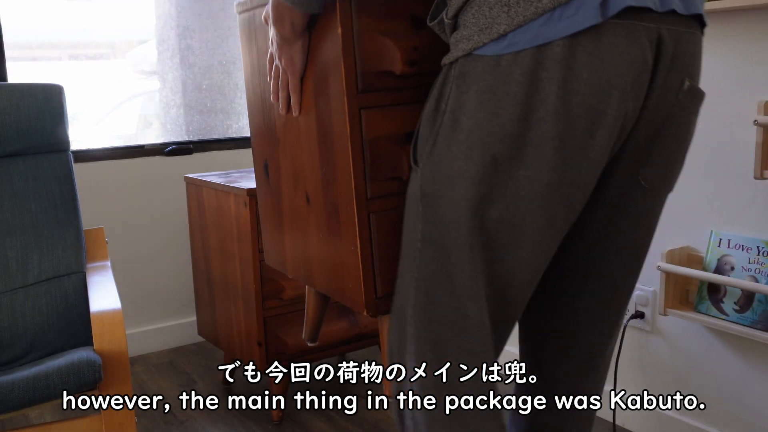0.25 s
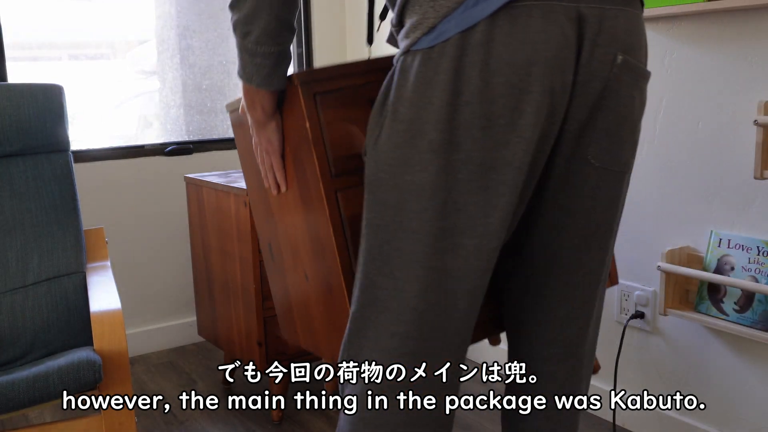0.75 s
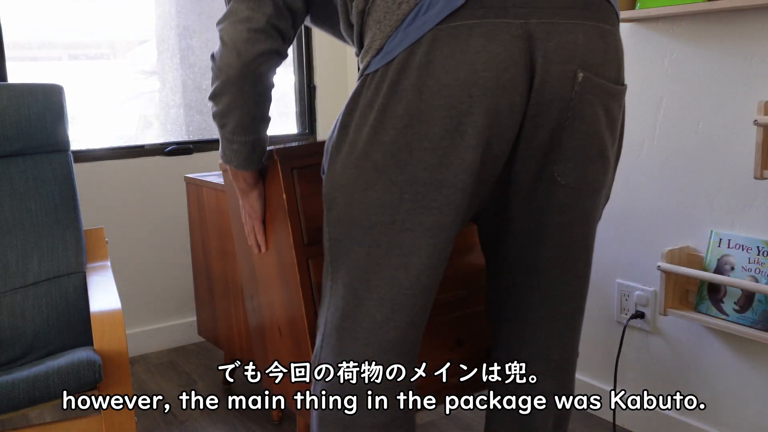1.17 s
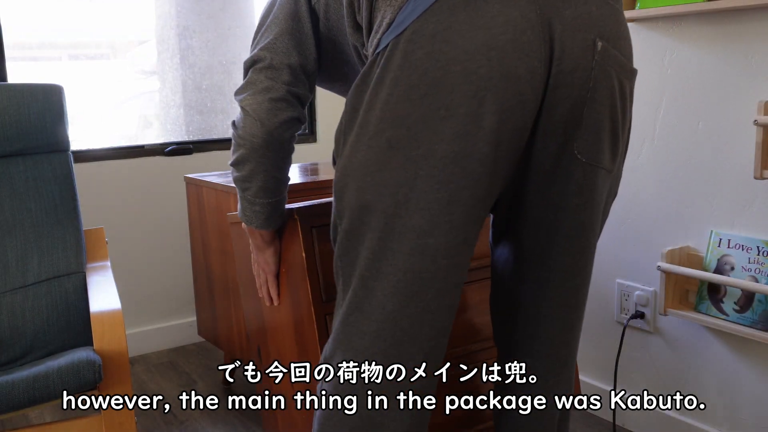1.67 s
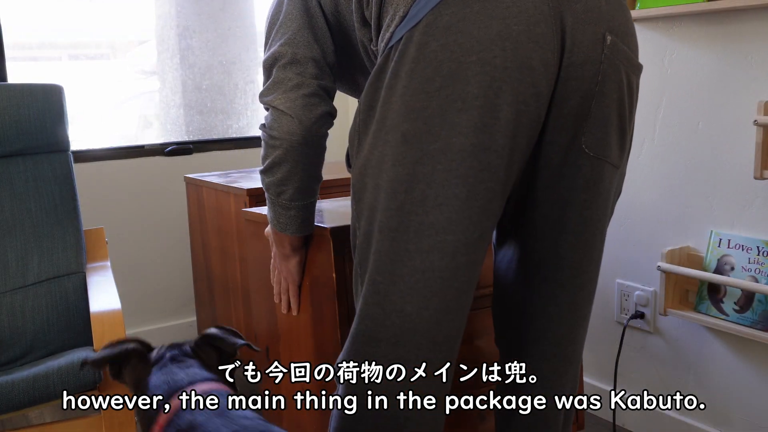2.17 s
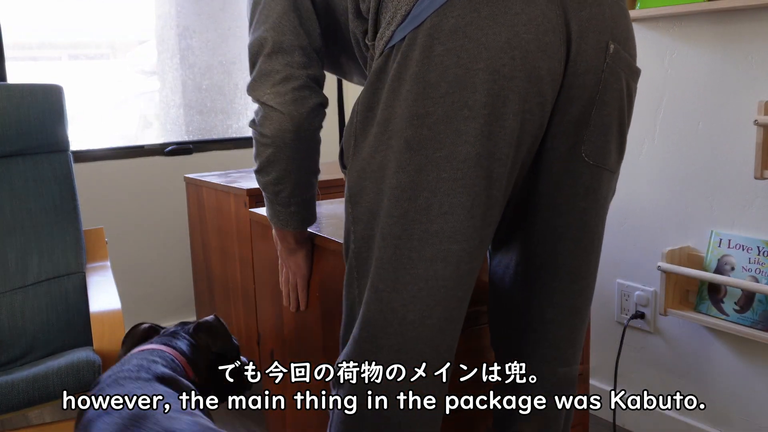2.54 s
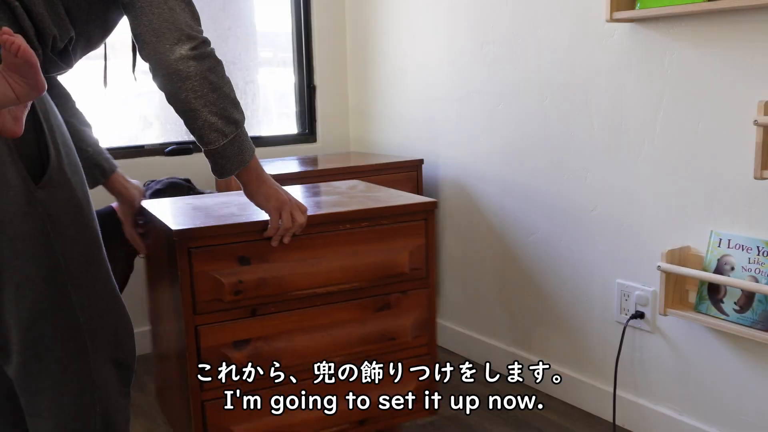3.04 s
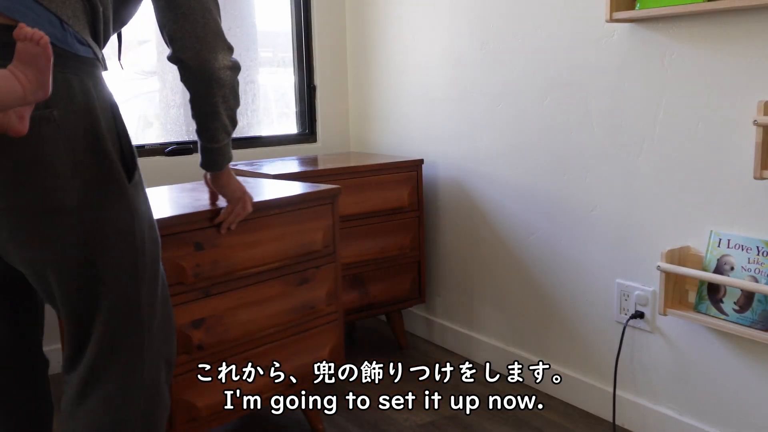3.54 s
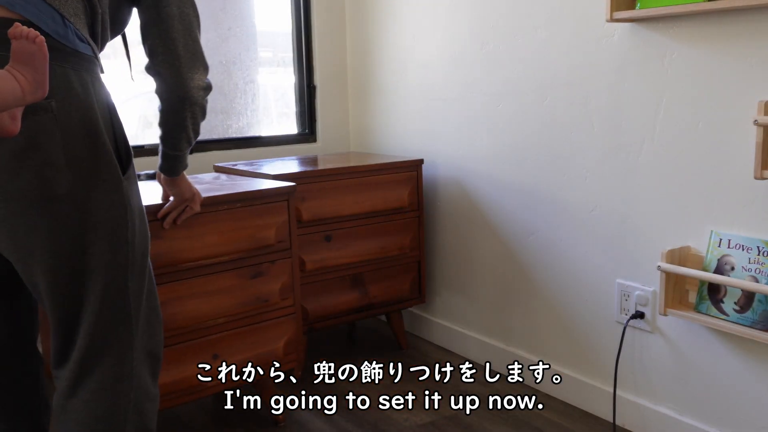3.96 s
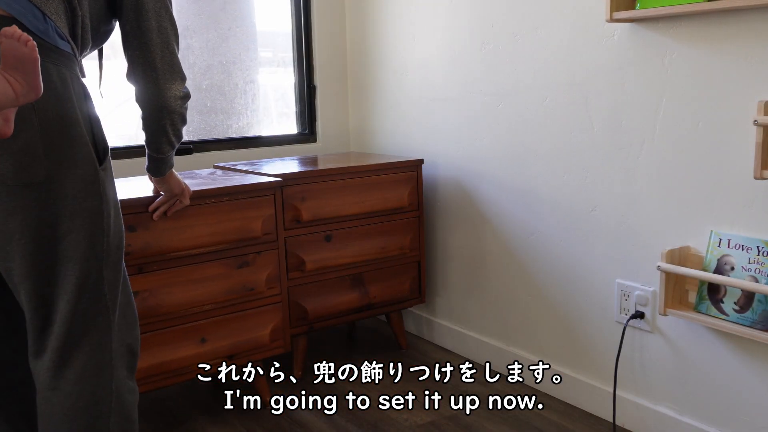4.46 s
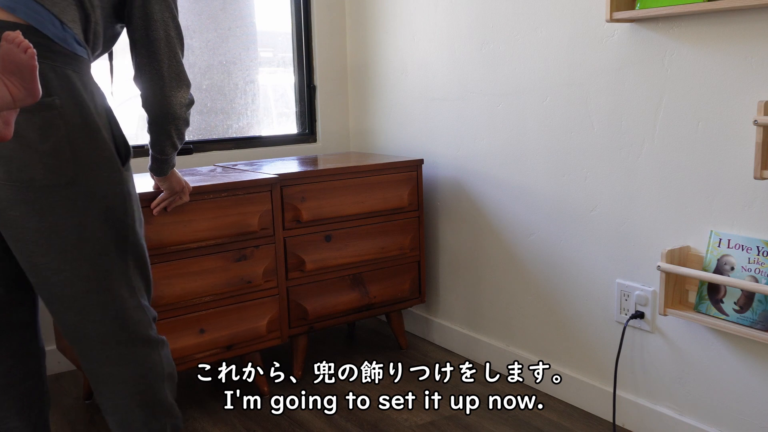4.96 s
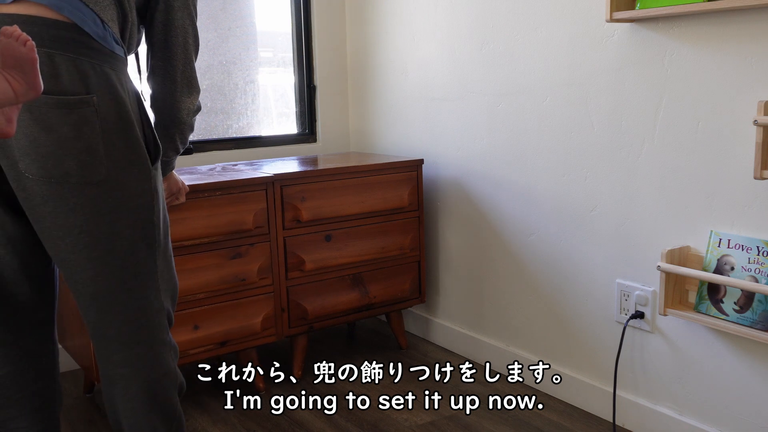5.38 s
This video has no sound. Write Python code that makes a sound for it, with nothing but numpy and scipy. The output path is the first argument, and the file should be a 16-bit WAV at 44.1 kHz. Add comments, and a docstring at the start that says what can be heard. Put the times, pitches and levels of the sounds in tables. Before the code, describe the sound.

A wooden chest of drawers is tilted and set down with rattling knocks, then abruptly it is pushed hissing and scraping across a hard floor.

```python
"""A small wooden chest of drawers is tilted and set down on a hard bedroom floor: flurries of tiny
impacts, ringing in the modes of the wood, make the loose drawers rattle against the case.
Hands and clothes rub on it as coloured noise in strokes; legs tick and scuff as short runs of slips.
After a sudden cut the chest is pushed along: dense slips make a long hiss, one foot sings faintly as
a wavering sine, and the chest bumps as it slows. Each spot of contact has its own bedroom echoes."""
import sys
import numpy as np
from scipy import signal
from scipy.fft import rfft, irfft
from scipy.io import wavfile

SR = 44100
rng = np.random.default_rng(int(sys.argv[2]) if len(sys.argv) > 2 else 0)


def pcm_store(signal):
    """Save signal as 16-bit PCM."""
    levels = np.round(np.clip(np.atleast_2d(signal), -1, 1) * 32767)
    wavfile.write(sys.argv[1], SR, levels.astype(np.int16).T)


N = 247644
TIME = np.arange(N) / SR
CUT_S = 2.997  # setting down before it, pushing after it


def undb(db):
    """Decibels to gain."""
    return 10 ** (np.asarray(db) / 20)


def unit(x):
    """Scale to an energy of one."""
    return x / np.sqrt(np.sum(x ** 2) + 1e-18)


def at_hz(points, hz):
    """Read (Hz, value) points on a log-frequency axis."""
    point_hz, value = np.transpose(points)
    return np.interp(np.log(np.maximum(hz, 1)), np.log(point_hz), value)


def gain_curve(points):
    """(s, dB) points as one gain per sample."""
    return undb(np.interp(TIME, *np.transpose(points)))


def convolve(x, impulse_response):
    """Pass a sound through an impulse response."""
    return signal.oaconvolve(x, impulse_response)[:len(x)]


def response(points, size=4096):
    """Causal, minimum-phase impulse response with the given (Hz, dB) gains."""
    gains = undb(at_hz(points, np.fft.rfftfreq(size, 1 / SR)))
    cepstrum = irfft(np.log(gains))
    # fold the cepstrum forward so the energy comes as early as it can
    cepstrum[1:size // 2] *= 2
    cepstrum[size // 2 + 1:] = 0
    return irfft(np.exp(rfft(cepstrum)))


def colour(x, points):
    """Give a sound a spectrum; white noise keeps its level."""
    return convolve(x, unit(response(points)))


def walk(rate):
    """Smooth chance with a spread near one, turning about rate times a second."""
    values = rng.standard_normal(2048)
    return np.interp(TIME * rate, np.arange(len(values)), values)


def contacts(rate, spread_db, count=N):
    """Tiny impacts of uneven size, rate a second, with an rms of one."""
    happens = rng.random(count) < rate / SR
    sizes = undb(spread_db * np.clip(rng.standard_normal(count), -2, 2))
    signs = rng.choice([-1, 1], count)
    return unit(happens * sizes * signs) * np.sqrt(count)


def chatter(rise, fall, rate, spread_db, count=16384):
    """A flurry of impacts that swells to the middle of its window and dies away."""
    t = (np.arange(count) - count // 2) / SR
    swell = np.exp(np.where(t < 0, t / rise, -t / fall))
    return contacts(rate, spread_db, count=count) * swell


SPILL_S, SPILL_SHARE = 0.0073, 0.85  # a flurry dies in this time plus this share of its rise


def flurry_of(rise, rate, spread_db):
    """Impacts that build slowly also die slowly."""
    return chatter(rise, SPILL_S + SPILL_SHARE * rise, rate, spread_db)


def add(track, s, sound):
    """Mix a short sound into a track from time s on."""
    start = int(s * SR)
    skip, stop = max(-start, 0), min(len(sound), N - start)
    track[start + skip:start + stop] += sound[skip:stop]


def place(track, s, flurry, db):
    """A track with the flurry centred on s; db is its energy spread over 40 ms."""
    out = track.copy()
    add(out, s - len(flurry) / 2 / SR, unit(flurry) * undb(db) * np.sqrt(.04 * SR))
    return out


def mode(hz, t60):
    """One fading resonance."""
    t = np.arange(SR // 3) / SR
    return np.cos(2 * np.pi * hz * t) * np.exp(-np.log(1000) * t / t60)


# Colour of the still background: (frequency [Hz], relative level [dB])
AIR_COLOUR = [(25, -10), (100, -9), (300, -15), (700, 8), (3000, 5), (8000, -0.5), (16000, -19)]


def background_air(level_db=-61):
    """Steady coloured noise as a bed under everything."""
    return undb(level_db) * colour(rng.standard_normal(N), AIR_COLOUR)


# How hard hands and clothes rub on the tilted chest: (time [s], relative level [dB])
HANDLING = [(0, -36.5), (.18, -41.5), (.34, -36.5), (.66, -35), (.9, -45.5), (1.7, -50), (2.18, -55.5),
            (2.33, -43.5), (2.7, -40.5), (2.87, -58)]
# Colour of cloth and palms on wood: (frequency [Hz], relative level [dB])
RUSTLE_COLOUR = [(80, -49), (200, -31), (400, -11), (700, 1), (1500, 4.5), (2300, 5), (3400, 3.5),
                 (5500, 2), (8000, -6), (12000, -16), (16000, -19)]
# Colour of grit ticks, and of the dust under a scuffing leg: (frequency [Hz], relative level [dB])
FIZZ_COLOUR = [(2000, -82), (4500, 4), (7000, 10), (10000, 2.5), (16000, -5)]


def handling(level, rustle_db=0.5, tick_db=-16):
    """Cloth and palms rub in uneven strokes, with stray ticks of grit."""
    fibres = contacts(rate=2500, spread_db=5)
    specks = contacts(rate=35, spread_db=5)
    strokes = undb(2 * walk(35))
    cloth = colour(fibres, RUSTLE_COLOUR) * strokes * undb(rustle_db)
    ticks = undb(tick_db) * colour(specks, FIZZ_COLOUR)
    return level * (cloth + ticks)


# Resonances of the case and drawers: (frequency [Hz], relative level [dB], t60 [s])
CASE_MODES = [(151.5, 0.5, 0.31), (189.7, -0.5, 0.13), (231, -5.5, 0.49), (332, -33, 0.22), (377, -4, 0.31),
              (445, -11.5, 0.59), (431, 1, 0.25), (572, -6, 0.13), (622, -6, 0.13), (685, -24, 0.31),
              (729, -7.5, 0.077), (1030, -1.5, 0.075), (1200, -15, 0.13), (1210, -19, 0.35),
              (1420, -16, 0.18), (1650, -24, .22), (1860, -10, 0.39), (1895, -12, 0.2), (2260, -33, .2),
              (2506, -11, 0.16)]


def case(force, direct_db=-2, ring_db=-31):
    """The chest passes a force on at once and rings on in its modes."""
    ring = sum(undb(db) * unit(mode(hz, t60)) for hz, db, t60 in CASE_MODES)
    return undb(direct_db) * force + undb(ring_db) * convolve(force, ring)


# Drawers and legs knocking against the case: (time [s], rise [s], relative level [dB],
# hardness [0-1], ring of the struck part [Hz], ring over the level [dB])
BUMPS = [ (.006, 0.015, -37, 0.8, 1290, -8), (.043, 0.00037, -34.5, 0.91, 1628, 2),
         (0.334, 0.0065, -29.5, 0.78, 627, -2.5), (.407, 0.00045, -33.5, 0.34, 405, -11),
         (.488, 0.0074, -32, 0.34, 480, -11), (.631, 0.025, -23.5, 0.96, 413, -5),
         (0.662, 0.011, -19.5, 0.98, 471, -7.5), (.682, 0.0023, -31, 0.36, 1504, 3.5),
         (1.0, 0.0066, -20.5, 0.7, 440, -13), (1.017, 0.0069, -28.5, 0.5, 1120, -22),
         (1.058, 0.007, -41, .1, 233, 2.5), (1.167, 0.0078, -36.5, 0.92, 1555, -3),
         (1.214, 0.0045, -22, 0.17, 767, -3), (1.23, 0.0023, -29.5, 0.09, 332, -0.5),
         (1.46, 0.00045, -40.5, 0.83, 1738, -2), (1.465, 0.0017, -49, 0.76, 1185, 5),
         (1.993, 0.013, -31.5, 0.57, 440, -10), (2.375, 0.012, -27.5, 0.4, 470, -9),
         (2.404, 0.015, -22, 0.34, 500, -13), (2.429, 0.016, -27.5, 0.2, 210, -5),
         (2.974, 0.0041, -29, 0.21, 540, -3.5), (2.986, 0.0024, -35.5, 0, 337, -18),
         (3.051, 0.022, -43.5, 0, 413, -4), (3.29, 0.06, -47.5, 0, 377, 2.5),
         (5.07, 0.0067, -32, 0.5, 187, -8), (5.281, 0.0066, -28.5, 0.3, 163, -6),
         (5.3, 0.0033, -42.5, 0, 382, 11), (5.338, 0.0093, -37, 0.14, 366, -2)]
# Colour of soft blows in the carcass: (frequency [Hz], relative level [dB])
THUD_COLOUR = [(30, -56), (70, -39), (110, -7), (160, -9.5), (210, 1.5), (330, 2.5), (500, 6.5), (700, 3.5),
               (1100, -19), (3000, -86.5)]
# Colour of hard blows on the panels: (frequency [Hz], relative level [dB])
CLACK_COLOUR = [(100, -58), (250, -15), (550, -13.5), (800, 3), (1500, 5), (2100, 4), (3000, -8.5),
                (6000, -23), (15000, -71)]
# Colour of hard blows on the edges: (frequency [Hz], relative level [dB])
CRACK_COLOUR = [(700, -9), (1800, -24), (2800, 11), (4300, 3), (6300, -4.5), (9000, -18), (12000, -19),
                (16000, -42)]
CRACK_DB = -5.5  # edges against panels


def bumps(rows):
    """Drawers chatter on the case: soft blows thud in the carcass, hard ones clack panels, crack edges."""
    thud, clack, crack, parts = np.zeros((4, N))
    for s, rise, db, hardness, ring_hz, ring_db in rows:
        flurry = flurry_of(rise, rate=2000, spread_db=6.5)
        # hardness shares the energy between clack and thud
        hard = np.clip(hardness, .01, .99)
        thud_db = db + 10 * np.log10(1 - hard)
        clack_db = db + 10 * np.log10(hard)
        thud = place(thud, s, flurry, thud_db)
        clack = place(clack, s, flurry, clack_db)
        crack = place(crack, s, flurry, clack_db + CRACK_DB)
        struck = mode(ring_hz, t60=0.093)
        parts = place(parts, s, convolve(flurry, struck), db + ring_db)
    body = case(colour(thud, THUD_COLOUR) + colour(clack, CLACK_COLOUR))
    return body + colour(crack, CRACK_COLOUR) + parts


SHIVER_DB, SETTLE_S = -16.5, 0.095  # shiver against its knock, and its decay time


def settling(knocks):
    """Each knock leaves the drawers shivering less and less."""
    level = 0
    for s, _, db, *_ in knocks:
        fade = (TIME > s) * np.exp(-np.abs(TIME - s) / SETTLE_S)
        level = level + undb(db + SHIVER_DB) * fade
    return level


# Colour of the shivering drawers and droning panels: (frequency [Hz], relative level [dB])
MURMUR_COLOUR = [(30, -30), (105, -48), (160, -14), (210, -7), (290, 0.5), (400, 1), (650, 1.5), (900, -5),
                 (1250, -2.5), (2500, -15.5), (8000, -46)]


def murmur(level, gain_db=-1.0):
    """Loose drawers shiver faintly in the moving case."""
    taps = contacts(rate=900, spread_db=3)
    return case(colour(taps, MURMUR_COLOUR) * level * undb(gain_db))


# Steps on the floorboards: (time [s], relative level [dB])
STEPS = [(1.663, -54.5), (1.987, -50), (3.019, -55), (3.14, -60), (3.441, -60)]
# Colour of the loaded boards: (frequency [Hz], relative level [dB])
BOOM_COLOUR = [(20, -29), (45, -16), (90, 4), (150, -5), (500, -76)]
BOARD_DB = -34.5  # floorboards against the knock that loads them


def floorboards(loads):
    """The boards boom softly under the weight of legs and feet."""
    force = np.zeros(N)
    for s, db in loads:
        flurry = chatter(rise=.005, fall=.03, rate=1500, spread_db=2)
        force = place(force, s, flurry, db)
    return colour(force, BOOM_COLOUR)


# A leg touches down and skids: (time [s], rise of the skid [s], tick level [dB], skid level [dB],
# dust over both [dB])
SCUFFS = [ (.042, 0.0022, -27.5, -24.5, -16.5), (0.231, 0.014, -37, -31.5, -11.5),
          (.305, 0.015, -46, -28.5, -6.5), (.406, 0.004, -31, -31.5, -28),
          (.524, 0.0059, -34.5, -29.5, -4.5), (.618, 0.021, -62, -34, 1), (0.765, 0.0082, -47, -36, -5),
          (1.043, .005, -34.5, -32.5, -7), (1.08, 0.0036, -48, -41, 0), (1.324, .008, -34.5, -36.5, -9.5),
          (1.57, 0.014, -41, -31, -7.5), (1.643, 0.0068, -48, -35, -16), (1.865, 0.027, -56, -32.5, -9.5),
          (2.351, 0.0068, -63, -36, -3.5), (2.701, .007, -42, -43, -4.5), (3.402, 0.014, -54, -29, -9),
          (4.131, 0.0075, -30.5, -25.5, -30), (4.521, .011, -40, -20, -14), (5.029, .003, -34, -27, -15),
          (5.226, 0.0069, -36.5, -33, -6.5)]
# Colour of a leg on the floor: (frequency [Hz], relative level [dB])
RASP_COLOUR = [(80, -38), (200, -47), (700, -13), (1700, -8), (2500, 0.5), (3300, 5), (4800, 1),
               (7000, -7.5), (10000, -20), (16000, -61)]
SKID_PEAK_RISES = 2.1  # a skid is loudest this many rise times after the tick
TICK_RISE_S, TICK_FALL_S = 0.0001, 0.0036


def scuffs(rows):
    """A leg ticks and skids in a run of slips, too quick to stir the case; dust fizzes under it."""
    rasp, fizz = np.zeros((2, N))
    for s, rise, tick_db, skid_db, dust_db in rows:
        tick = chatter(TICK_RISE_S, TICK_FALL_S, rate=6000, spread_db=2)
        slips = flurry_of(rise, rate=4000, spread_db=0.5)
        dust = flurry_of(rise, rate=1500, spread_db=6.5)
        peak = s + SKID_PEAK_RISES * rise
        rasp = place(rasp, s, tick, tick_db)
        rasp = place(rasp, peak, slips, skid_db)
        fizz = place(fizz, s, tick, tick_db + dust_db)
        fizz = place(fizz, peak, dust, skid_db + dust_db)
    return colour(rasp, RASP_COLOUR) + colour(fizz, FIZZ_COLOUR)


ROCK_FROM_S, ROCK_TO_S, ROCK_EASE_S, ROCK_DB = 1.6, 2.298, 0.064, -53


def rocking():
    """Level of steady shaking while the chest is rocked round on its legs, eased in and out."""
    to_nearest_end = np.minimum(TIME - ROCK_FROM_S, ROCK_TO_S - TIME)
    return undb(ROCK_DB) * np.clip(to_nearest_end / ROCK_EASE_S, 0, 1)


# Resonances of the broad panels: (frequency [Hz], relative level [dB], t60 [s])
PANEL_MODES = [(208, 3.5, 0.21), (393, -6.5, 0.049)]
ROCK_DRONE_DB, PUSH_DRONE_DB = 2.5, -12.5  # against the shaking of the drawers


def drone(level):
    """The creeping legs keep the broad panels humming."""
    panels = unit(sum(undb(db) * unit(mode(hz, t60)) for hz, db, t60 in PANEL_MODES))
    hum = unit(convolve(panels, response(MURMUR_COLOUR)))
    return convolve(level * contacts(rate=900, spread_db=6.5), hum)


# Sliding speed of the push: (time [s], speed against full speed [dB])
PUSH_SPEED = [(3.0, -0.5), (3.75, -1.5), (4.02, -3.5), (4.5, -3.5), (4.87, -9), (5.2, -8.5), (5.36, -14),
              (5.46, -31)]
# Colour of feet sliding on the floor: (frequency [Hz], relative level [dB])
SLIDE_COLOUR = [(100, -59), (220, -32), (400, -22), (700, -5), (950, -4.5), (1250, -1.5), (1600, -2),
                (2400, 1.5), (2850, 1.5), (3400, 4.5), (4300, 3.5), (5200, -6), (7000, -13), (10000, -18.5),
                (16000, -49)]
# Colour of grit crushed under the feet: (frequency [Hz], relative level [dB])
GRIT_COLOUR = [(3000, -23.5), (5500, 8), (7000, 7.5), (9500, 1.5), (12000, -4.5), (16000, -8)]
FRICTION_DB = -31  # drive at full speed; grows in step with speed
GRIT_DB, GRIT_POWER = -37.5, 2.63  # grit grows faster than speed
JUDDER_DB, JUDDER_POWER = -47, 0.11  # the case shakes at almost any speed


def push(friction, grit, slide_db=1.5, grit_db=4.5, uneven_db=0.47):
    """The feet slide over the floor: dense slips hiss and grit sparkles at speed."""
    slips = contacts(rate=9000, spread_db=4.5)
    grains = contacts(rate=5000, spread_db=4)
    grip = undb(uneven_db * walk(45))
    hiss = colour(slips, SLIDE_COLOUR) * friction * undb(slide_db)
    sparkle = colour(grains, GRIT_COLOUR) * grit * undb(grit_db)
    return grip * (hiss + sparkle)


# A foot singing on the floor, before waver and flutter: (time [s], pitch [Hz], level [dB])
WHISTLE = [(3.09, 3540, -58), (3.12, 3520, -31), (3.271, 3333, -41), (3.43, 3305, -35), (3.56, 3420, -44)]


def whistle(waver=0.0192, flutter_db=3):
    """One foot sings faintly early in the push: a sine whose pitch wavers and level flutters."""
    s, hz, db = np.transpose(WHISTLE)
    pitch = np.interp(TIME, s, hz) * (1 + waver * walk(300))
    level_db = np.interp(TIME, s, db, left=-np.inf, right=-np.inf) + flutter_db * walk(80)
    return undb(level_db) * np.sin(2 * np.pi * np.cumsum(pitch) / SR)


# Bedroom echo decay: (frequency [Hz], t60 [s])
ROOM_DECAY = [(100, 0.39), (400, 0.33), (1500, 0.35), (4000, 0.33), (12000, 0.34)]
# How far the two microphones disagree on the echoes: (frequency [Hz], side minus mid [dB])
ECHO_WIDTH = [(60, -44), (125, -71), (250, -32), (500, -19), (1000, -15.5), (2000, -12), (4000, -6),
              (8000, -3), (14000, 1)]


def echoes(build_s=0.0008, size=22050):
    """Dense wall echoes from one spot, as mid and side; the microphones differ mostly in the treble."""
    t, hz = np.arange(size) / SR, np.fft.rfftfreq(size, 1 / SR)
    centres = np.transpose(ROOM_DECAY)[0]
    noise, tails = rfft(rng.standard_normal((2, size))), 0
    # overlapping bands, each fading at its own pace
    for share, (_, t60) in zip(np.eye(len(ROOM_DECAY)), ROOM_DECAY):
        band = irfft(noise * at_hz(np.c_[centres, share], hz))
        tails = tails + band * np.exp(-np.log(1000) * t / t60) / np.sqrt(t60)
    mid, side = (unit(tail * (1 - np.exp(-t / build_s))) for tail in tails)
    return mid, convolve(side, response(ECHO_WIDTH))


def room(x, hops, direct_db=-4.5, echo_db=-3.5, count=6):
    """Straight sound plus echoes; contact drifts among spots, hops turns a second, each with its echoes."""
    shares = np.array([walk(hops) for _ in range(count)])
    shares = shares / np.linalg.norm(shares, axis=0)
    out = undb(direct_db) * x
    for share in shares:
        sent = undb(echo_db) * share * x
        mid, side = echoes()
        # side goes to left and right with opposite signs
        out = out + convolve(sent, mid) + np.array([[1], [-1]]) * convolve(sent, side)
    return out


def shot(start, end, shiver, drone_db, rubbing, landings, pan_db=-0.64):
    """Layers for one span of events: wood rings from few places, the rubbing comes from many."""
    knocks, skids, steps = ([row for row in table if start <= row[0] < end]
                            for table in (BUMPS, SCUFFS, STEPS))
    shaking = murmur(shiver + settling(knocks)) + drone(shiver * undb(drone_db))
    wood = bumps(knocks) + shaking + floorboards(steps + landings)
    surface = scuffs(skids) + rubbing
    pan = undb(np.array([[pan_db], [-pan_db]]) / 2)
    # the broad panels face the microphone, so they sound drier than the feet down on the floor
    panels = room(wood, hops=20, direct_db=-3.5, echo_db=-3.5)
    return panels + pan * room(surface + background_air(), hops=150)


def scene():
    """Setting down, where every knock loads the floor, then the push; the cut chops off a knock."""
    rustle, speed = gain_curve(HANDLING), gain_curve(PUSH_SPEED)
    landings = [(s, db + BOARD_DB) for s, _, db, *_ in BUMPS if s < CUT_S]
    setting_down = shot(0, CUT_S, rocking(), ROCK_DRONE_DB, handling(rustle), landings)

    friction = undb(FRICTION_DB) * speed
    grit = undb(GRIT_DB) * speed ** GRIT_POWER
    judder = undb(JUDDER_DB) * speed ** JUDDER_POWER
    feet = push(friction, grit) + whistle()
    sliding = shot(CUT_S, np.inf, judder, PUSH_DRONE_DB, feet, [])
    return np.where(TIME < CUT_S, setting_down, sliding)


def record(dry):
    """The microphone's range ends steeply at the top."""
    top_hz = 15900
    steep_lowpass = signal.ellip(10, .1, 70, top_hz, fs=SR, output="sos")
    return signal.sosfilt(steep_lowpass, dry)


dry = scene()
out = record(dry)
pcm_store(out)
```